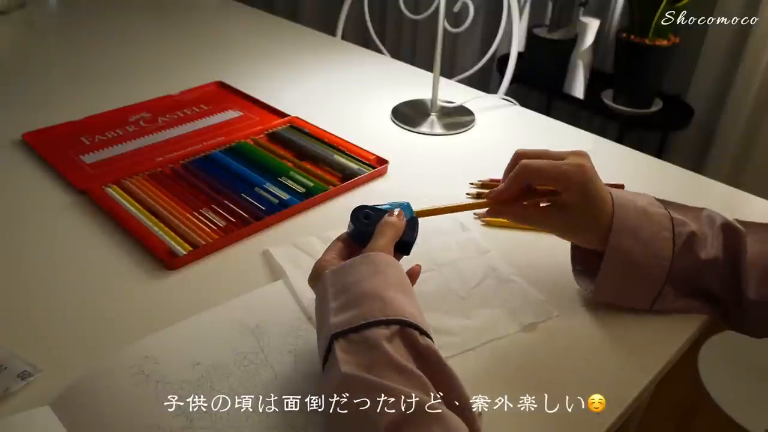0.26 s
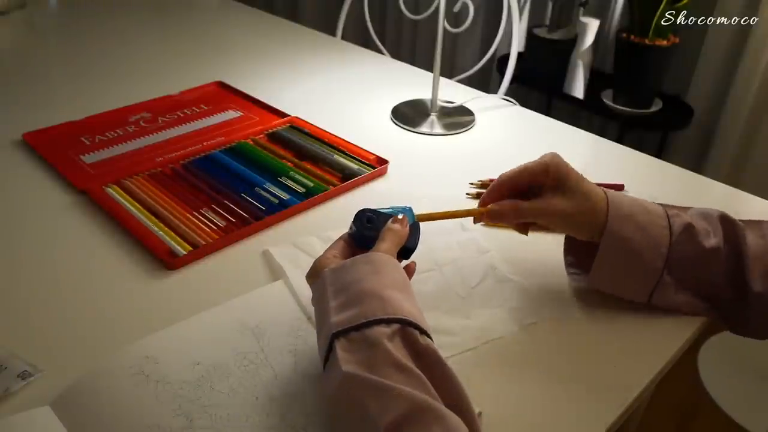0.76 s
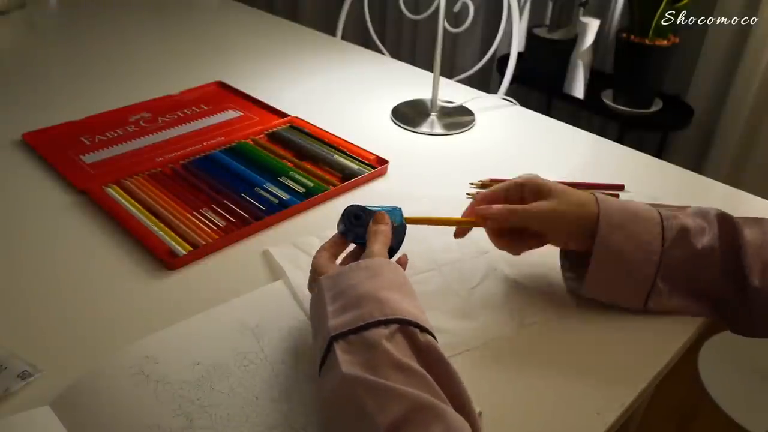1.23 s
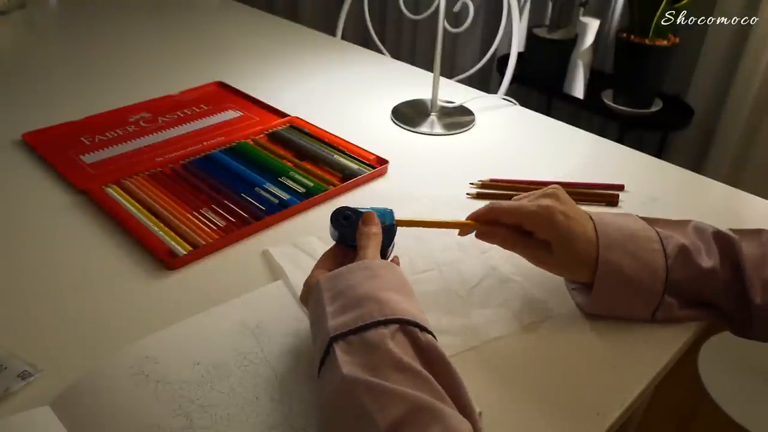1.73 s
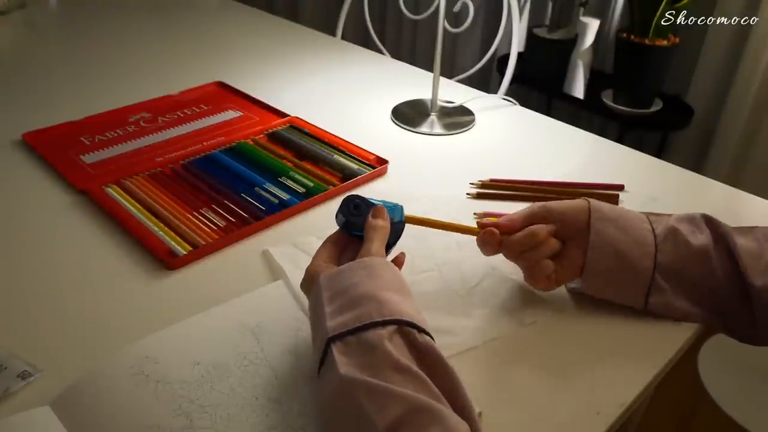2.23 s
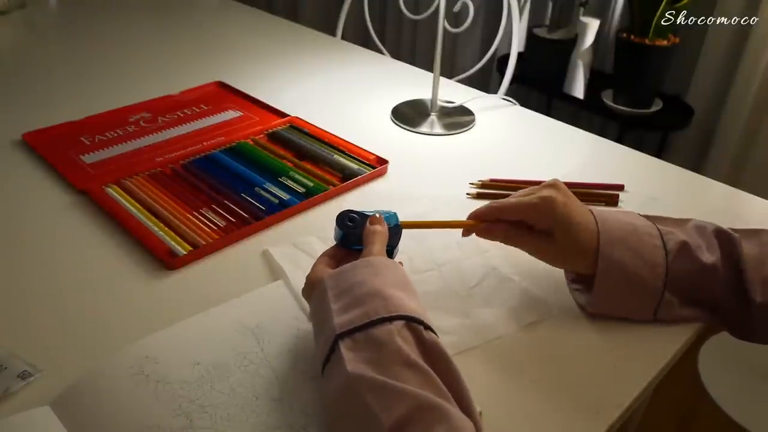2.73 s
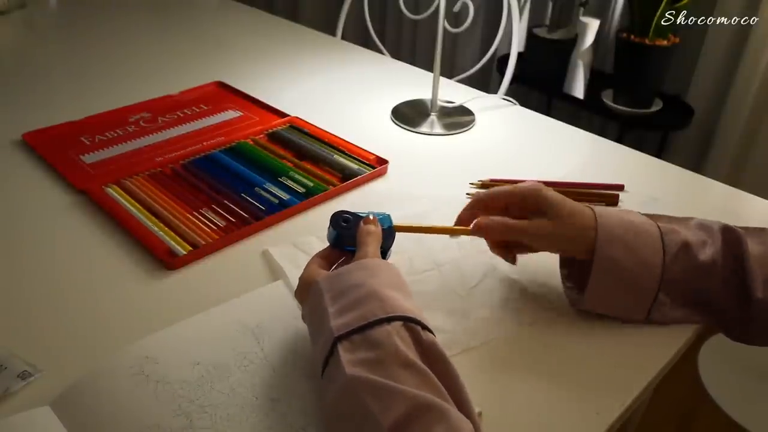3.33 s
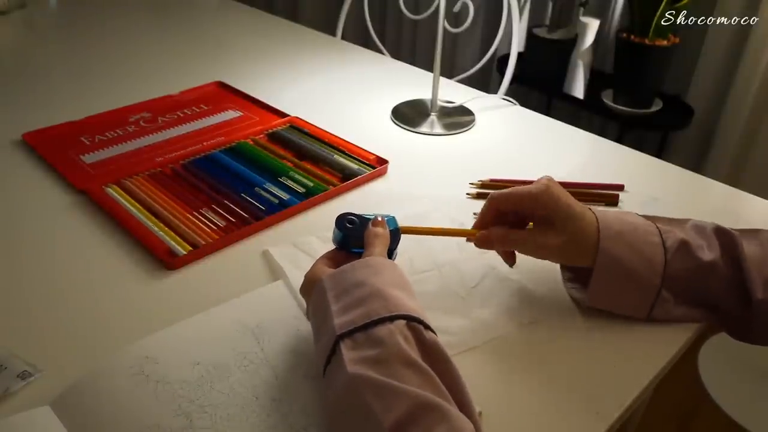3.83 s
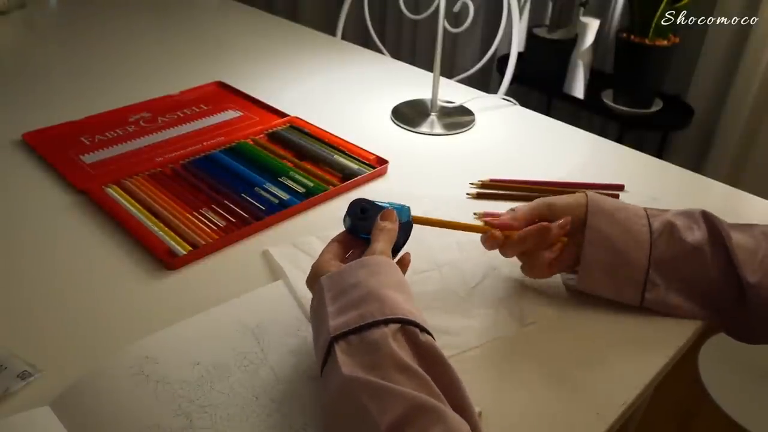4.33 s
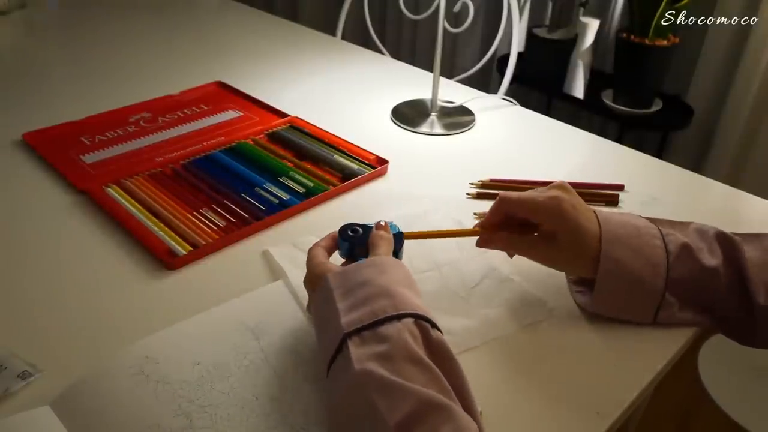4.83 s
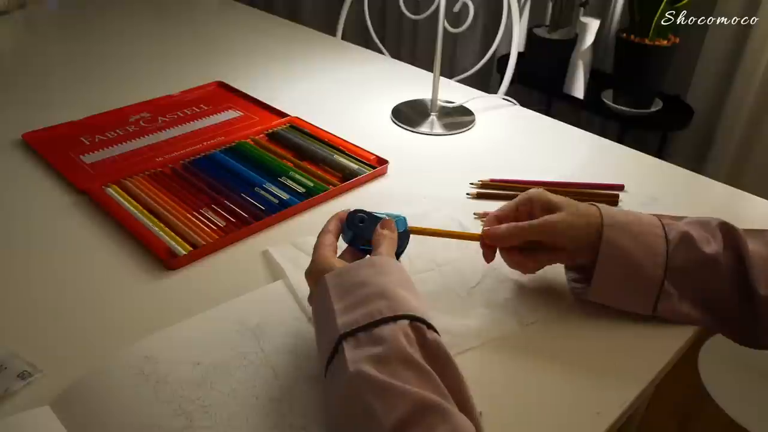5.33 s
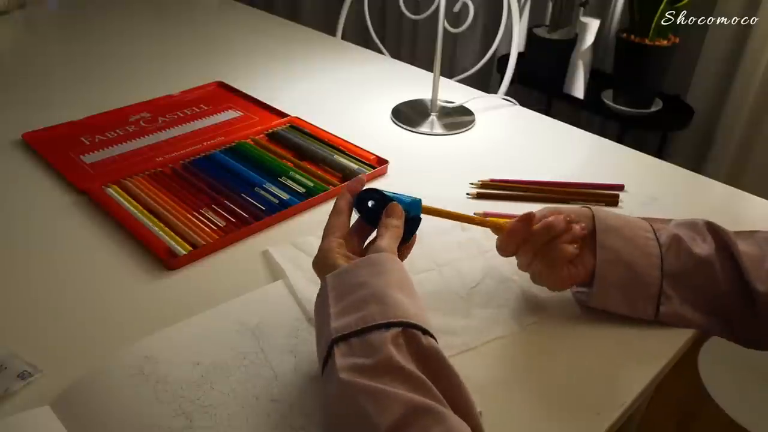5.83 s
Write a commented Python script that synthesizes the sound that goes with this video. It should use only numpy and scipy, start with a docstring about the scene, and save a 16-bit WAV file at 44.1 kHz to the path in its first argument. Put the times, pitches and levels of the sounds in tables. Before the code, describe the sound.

A wooden pencil is twisted five times in a small plastic sharpener, giving crisp, dry, crackly scrapes with quiet pauses in a still room.

```python
"""A pencil sharpener: a wooden pencil is twisted five times in a small plastic case, in a quiet room.
The blade lifts the shaving in a stream of tiny fractures, a noise of grains that rings in pencil, blade
and case; bigger splinters snap as decaying bursts. The fingers rub (slow filtered grains) and bump
(damped low modes), and cloth brushes the desk once (filtered noise). Reflections and a short diffuse
tail give the room; coloured noise gives its still air."""
import sys
import numpy as np
from scipy import signal
from scipy.fft import rfft, irfft, next_fast_len
from scipy.io import wavfile

SR = 44100
rng = np.random.default_rng(int(sys.argv[2]) if len(sys.argv) > 2 else 0)


def bounce(signal):
    """Save signal as a 16-bit WAV file at the path given by the first command-line argument."""
    frames = np.transpose(np.atleast_2d(signal))
    limited = np.clip(frames, -1, 1)
    pcm = np.round(limited * 32767).astype(np.int16)
    wavfile.write(sys.argv[1], SR, pcm)


N = 267687
TIME = np.arange(N) / SR  # s

# resonances of pencil and blade while each twist skims the wood:
# (centre [Hz], width [Hz], level [dB])
SKIM_1 = [(3700, 440, -21), (4740, 390, 7), (5600, 400, 3), (6180, 950, 14.5), (7340, 700, 4),
          (9200, 1500, -2), (13200, 700, 2)]
SKIM_2 = [(1830, 300, 3), (3650, 480, 10), (4530, 500, 6), (5660, 660, 2), (7200, 1100, 6),
          (11700, 1900, 7)]
SKIM_3 = [(2900, 800, -2), (4440, 290, 5.5), (5700, 1400, -13), (6760, 400, 9), (7300, 1200, 4),
          (11300, 670, -3), (13200, 900, 0)]
SKIM_4 = [(1600, 230, -7), (2040, 1300, 9), (3820, 560, -1), (5250, 600, 2), (6070, 400, 0), (7870, 550, 7),
          (13150, 500, 4)]
SKIM_5 = [(1820, 770, 7.5), (2630, 220, 0), (3250, 200, 6.5), (3750, 190, -17), (4570, 1500, 4),
          (5940, 440, 0), (7860, 500, -4), (13300, 600, 3)]
# resonances of pencil and blade once the blade bites deep:
# (centre [Hz], width [Hz], level [dB])
BITE_1 = [(1750, 340, -7), (3200, 140, 10.5), (3650, 540, -14), (4770, 280, 11), (5500, 270, 2),
          (6220, 440, 12), (11600, 900, -3)]
BITE_2 = [(1760, 200, 5.5), (3700, 500, 2), (5100, 600, 3), (6000, 400, 1), (7450, 1500, 6),
          (10300, 600, 5), (12300, 600, 3)]
BITE_3 = [(1760, 240, 4.5), (3230, 350, 6), (4100, 450, 4), (5700, 420, -9), (7000, 770, 5.5),
          (8040, 500, 3.5), (10400, 450, 1)]
BITE_4 = [(1820, 300, 3), (3680, 400, 0), (4670, 960, 7), (5800, 840, 7), (8750, 600, 5.5), (11400, 700, 2),
          (14400, 970, 5)]
BITE_5 = [(2490, 380, -10), (3470, 600, -2.5), (4920, 550, 3), (6100, 280, 7.5), (7750, 400, 6.5),
          (11500, 700, 4.5), (13400, 860, 5)]
# each twist: (skimming resonances, biting resonances)
GRIPS = [(SKIM_1, BITE_1), (SKIM_2, BITE_2), (SKIM_3, BITE_3), (SKIM_4, BITE_4), (SKIM_5, BITE_5)]
# a twist skims, bites deeper, then stops; skim and bite levels are those of the rasp as each stage begins:
# (start [s], bite [s], stop [s], skim level [dB], skim swell [dB/s], bite level [dB], bite swell [dB/s],
#  then relative to the rasp: pencil body [dB], hollow case [dB], fine hiss [dB])
TWISTS = [(0.664, 0.935, 1.083, -57.5, 32, -54, 92, 1.5, -10.5, 1.5),
          (1.898, 2.099, 2.255, -54, -19, -44, -30, -3, -8.5, 2),
          (2.774, 2.985, 3.16, -51, 19, -46, 16, -2.5, -9.5, 0.5),
          (3.77, 4.052, 4.31, -62, 45.5, -46.5, 3, -2.5, -7.5, 1),
          (4.935, 5.49, 5.854, -52, 5, -46, -26.5, 2, -3, 2.5)]
# the biggest splinters snapping under the blade:
# (time [s], relative level [dB], ring [Hz], extra ring of the hollow case [dB])
SNAPS = [(0.765, -28, 6250, -7), (0.8397, -34, 6000, 6), (1.0675, -17.5, 5750, 3),
         (1.0804, -22.5, 5860, 1.5), (1.628, -45, 5070, 1.5), (1.8825, -37.5, 6200, 7),
         (1.91, -26, 11300, 6), (2.0844, -27.5, 7900, 3), (2.129, -30, 7340, 1.5), (2.363, -37.5, 8460, 10),
         (2.7767, -13, 7500, -3.5), (2.8013, -24.5, 7370, 5), (2.8502, -25.5, 7400, 0),
         (2.875, -27, 7700, 5), (2.9057, -27, 7440, 0), (3.018, -26, 8350, 1.5), (3.115, -21, 7900, -2),
         (3.1263, -20.5, 7000, 0), (3.8541, -37, 7800, 1.5), (4.0786, -30, 5100, 1.5),
         (4.105, -18, 5300, -5), (4.2457, -23.5, 6000, 9), (4.2756, -22, 9150, 1.5),
         (4.9467, -48, 8200, 1.5), (4.993, -31, 7950, 12), (5.0127, -29, 7760, 7), (5.0463, -28, 10400, -3),
         (5.1226, -19.5, 3200, 6), (5.2664, -32, 4500, 1.5), (5.4491, -27, 5840, 1.5),
         (5.4776, -27.5, 6000, 1.5), (5.5212, -19.5, 7730, -8), (5.7788, -23.5, 5330, 8)]


def sharpening(snap_db=0.5):
    """Superposition: five twists and the snaps, each twist with its own diffuse tail as the hands shift."""
    out = 0
    for row, (skim, bite) in zip(TWISTS, GRIPS):
        scrape = np.zeros(N)
        add(scrape, row[0], twist(row, skim, bite))
        out = out + room(scrape, tail_db=-7.0, side_db=-12.0)
    snaps = np.zeros(N)
    for time_s, level_db, ring_hz, case_db in SNAPS:
        add(snaps, time_s, from_db(level_db + snap_db) * snap(ring_hz, case_db))
    return out + room(snaps, tail_db=-2.0, side_db=-11.5)


# broad colour of breaking wood: (frequency [Hz], level [dB])
WOOD = [(500, -9), (1400, -18), (2000, -11.5), (2600, -15), (3300, -8.5), (4500, -1), (7200, 4), (9600, -1),
        (12000, 4.5), (13400, 4.5), (13900, 5.5), (15500, -3.5)]
# the sharpener's own resonances: (centre [Hz], width [Hz], level [dB])
SHARPENER = [(1717, 266, 5.5), (4020, 280, 5.5), (4900, 400, 3.5), (6340, 400, 6.5), (7950, 830, 3),
             (10850, 220, 4.5), (13500, 400, -5.5)]
ATTACK_S, RELEASE_DB_PER_S = 0.02, 222
CHIP_DB = -11.5  # relative to the fractures before their judder


def twist(row, skim, bite, judder_db=2.5, wander_db=1.0, turn_s=0.017):
    """Stick-slip cutting: the blade catches on the grain; its fractures ring in case, pencil and blade."""
    start_s, bite_s, stop_s, skim_db, skim_swell, bite_db, bite_swell, body_db, case_db, fine_db = row
    t = start_s + TIME[:SR * 5 // 4]
    cutting = t < stop_s
    turning = np.minimum(t, stop_s)

    # level and resonances shift as the blade digs in
    depth = .5 + .5 * np.tanh((t - bite_s) / turn_s)
    skim_effort_db = skim_db + skim_swell * (turning - start_s)
    bite_effort_db = bite_db + bite_swell * (turning - bite_s)
    effort_db = (1 - depth) * skim_effort_db + depth * bite_effort_db
    # once the turning stops, the sound dies away smoothly
    effort_db = effort_db - RELEASE_DB_PER_S * (t - turning) + holding_back(t)

    judder = from_db(judder_db * cutting * flutter(len(t), per_s=440))
    fractures = grains(len(t), per_s=6000, spread_db=4.0, smooth_db=-1) * judder
    cut = fractures + from_db(CHIP_DB) * chips(len(t)) * cutting
    skimmed = coloured(cut * (1 - depth), WOOD, SHARPENER + skim)
    bitten = coloured(cut * depth, WOOD, SHARPENER + bite)
    wood = skimmed + bitten

    case = from_db(effort_db + case_db) * band(wood, 786, 3040, cutting)
    body = from_db(effort_db + body_db) * band(wood, 2990, 6410, cutting)
    rasp = from_db(effort_db) * band(wood, 6600, 10000, cutting)
    hiss = from_db(effort_db + fine_db) * band(wood, 9660, 16200, cutting)
    # each fibre excites the parts in a different proportion
    parts = 0
    for part in (case, body, rasp, hiss):
        parts = parts + part * from_db(wander_db * flutter(len(t), per_s=150))
    return np.minimum((t - start_s) / ATTACK_S, 1) * parts


def grains(count, per_s, spread_db, smooth_db):
    """Impulsive excitation: tiny fractures of uneven size at random moments, over smooth friction."""
    sizes_db = spread_db * np.minimum(rng.exponential(1, count), 4)
    sizes = from_db(sizes_db) * rng.choice([-1, 1], count)
    cracks = rms_one(sizes * (rng.random(count) < per_s / SR))
    return rms_one(cracks + from_db(smooth_db) * rng.standard_normal(count))


CHIPS_PER_S = 65


def chips(count, crack_t60_s=0.021):
    """Random arrivals: small chips flake off, each starting an equal exponential decay filled with noise."""
    born = rng.random(count) < CHIPS_PER_S / SR
    decay = from_db(-60 / (crack_t60_s * SR))  # gain per sample
    envelope = signal.lfilter([1], [1, -decay], born + 1e-18)
    return rms_one(envelope * rng.standard_normal(count))


# the hand hesitates: (time [s], half length [s], dip [dB])
HESITATIONS = [(0.94, 0.047, -2.5), (4.972, 0.017, -12.5), (5.097, 0.024, -10), (5.199, 0.033, -5.5),
               (5.436, 0.075, -6.5)]
STICK_S, STICK_DB = 0.018, -3.0  # the blade sticks for a moment before each snap


def holding_back(t):
    """Modulation of the cutting in dB: dips where the hand hesitates and just before a splinter gives way."""
    hand = sum(db * np.exp(-((t - s) / half_s) ** 2) for s, half_s, db in HESITATIONS)
    stuck = np.max([(t < s) * np.exp(-((t - s) / STICK_S) ** 2) for s, *_ in SNAPS], axis=0)
    return hand + STICK_DB * stuck


# colour of a snap: (frequency [Hz], level [dB])
CRACK = [(500, -25), (1700, -14), (2600, -20.5), (3200, -4.5), (3900, -6.5), (4700, -1), (5500, -5),
         (7500, 0.5), (9000, -4), (11500, 0), (15500, -2)]
CASE_RING_HZ, CASE_RING_WIDTH_HZ = 2300, 1800


def snap(ring_hz, case_db, ring_width_hz=800, ring_db=10,
         crack_t60_s=0.0079, crumble_db=-22, crumble_t60_s=0.076, crest_db=9.5):
    """Sudden release: a splinter cracks sharply, then the fibres around it crumble more slowly."""
    t = TIME[:SR // 12]
    crack = rng.choice([-1, 1], len(t)) * from_db(-60 * t / crack_t60_s)
    crumbs = rng.standard_normal(len(t)) * from_db(crumble_db - 60 * t / crumble_t60_s)
    rings = [(ring_hz, ring_width_hz, ring_db), (CASE_RING_HZ, CASE_RING_WIDTH_HZ, case_db)]
    sound = coloured(crack + crumbs, CRACK, SHARPENER + rings)
    attack = sound[:SR // 500]  # the first 2 ms set the level
    return from_db(-crest_db) * sound / attack.std()


# dull bumps of the hands:
# (time [s], relative level [dB], main ring [Hz], hardness [dB per octave])
BUMPS = [(0.275, -35.5, 524, -7), (0.631, -43, 500, -8), (1.393, -31, 615, -3.5), (3.06, -37, 511, -12),
         (4.894, -38.5, 480, -6)]
# what a bump rings with besides its main ring: (frequency [Hz], level [dB], t60 [s])
BUMP_MODES = [(377, -22.5, 0.23), (558, 7, 0.019), (635, -22, 0.23), (1237, -0.5, 0.025)]


def bumps(bump_db=-1, main_t60_s=0.03, contact_s=0.0033):
    """Modal synthesis: soft knocks ring damped low modes; a harder contact brings out the upper ones."""
    out, t = np.zeros(N), TIME[:SR // 5]
    for time_s, level_db, main_hz, hard_db in BUMPS:
        knock = from_db(-60 * t / main_t60_s) * np.sin(2 * np.pi * main_hz * t)
        for hz, mode_db, t60_s in BUMP_MODES:
            tilt_db = hard_db * np.log2(hz / main_hz)
            knock += from_db(mode_db + tilt_db - 60 * t / t60_s) * np.sin(2 * np.pi * hz * t)
        knock *= 1 - np.exp(-t / contact_s)  # the soft contact builds up
        add(out, time_s, from_db(level_db + bump_db) * knock / np.abs(knock).max())
    return out


# fingers rubbing on the case: (time [s], relative level [dB])
RUB = [(0.0, -61.5), (0.59, -57.5), (0.96, -58.5), (1.39, -61.5), (1.55, -57), (2.57, -59), (2.82, -62),
       (3.52, -55), (4.26, -58.5), (4.77, -62.5), (5.21, -55.5), (6.07, -59.5)]
# colour of the rubbing: (frequency [Hz], level [dB])
RUB_COLOUR = [(120, -13.5), (170, -13), (220, 0), (330, -5), (450, -3.5), (660, -4.5), (780, -11.5),
              (1150, -8), (1500, -16), (2200, -22.5), (6000, -42)]
# low resonances under the rubbing: (centre [Hz], width [Hz], level [dB])
RUB_RINGS = [(412.5, 22, 9.5), (508, 56, 7.5)]
# colour of the sleeve on the desk: (frequency [Hz], level [dB])
BRUSH_COLOUR = [(800, -22), (1800, -4), (2600, 0.5), (3700, -10), (5300, -2), (8000, -18), (15000, -22)]
BRUSH_S, BRUSH_DB, BRUSH_RISE_DB_PER_S, BRUSH_FALL_DB_PER_S = 0.21, -54, 500, 300


def handling(rub_db=-1.0, uneven_db=1.63):
    """Dry friction: skin creeps over the case in small slips; a sleeve brushes the desk once."""
    slips = coloured(grains(N, per_s=500, spread_db=2.5, smooth_db=-1), RUB_COLOUR, RUB_RINGS)
    rub_level_db = np.interp(TIME, *np.transpose(RUB)) + rub_db + uneven_db * flutter(N, per_s=21)
    rub = from_db(rub_level_db) * rms_one(slips)
    cloth = coloured(rng.standard_normal(N), BRUSH_COLOUR)
    rise_db, fall_db = BRUSH_RISE_DB_PER_S * (BRUSH_S - TIME), BRUSH_FALL_DB_PER_S * (TIME - BRUSH_S)
    brush = from_db(BRUSH_DB - np.maximum(rise_db, fall_db)) * rms_one(cloth)
    return rub + brush


# reflections from desk and walls: (delay [s], level [dB])
ECHOES = [(.011, -17.5), (0.0248, -42)]
ROOM_T60_S = 0.16


def room(x, tail_db, side_db, build_s=0.0026):
    """Convolution with a room response: clear reflections, then a short diffuse tail that gives the width."""
    t = TIME[:SR // 3]
    envelope = from_db(-60 * t / ROOM_T60_S) * (1 - np.exp(-t / build_s))
    tails = rms_one(rng.standard_normal((2, len(t))) * envelope)
    mid, side = from_db([[tail_db], [side_db]]) * tails / np.sqrt(len(t))
    mid[0] += 1  # direct sound
    for delay_s, db in ECHOES:
        mid[round(delay_s * SR)] += from_db(db)
    response = np.array([mid + side, mid - side])
    return signal.fftconvolve(x[None], response, axes=1)[:, :N]


# colour of still room and microphone hiss: (frequency [Hz], level [dB])
AIR = [(20, -3.5), (30, -9), (43, -3), (54, -3.5), (72, -3.5), (105, -7.5), (400, -9), (1100, -16.5),
       (2300, -30), (3600, -22.5), (5300, -26), (6400, -21.5), (9800, -27), (15000, -22.5)]
# the room's faint hum: (centre [Hz], width [Hz], level [dB])
AIR_HUM = [(40.4, 10.6, 8), (418, 11.5, 9.5), (503.7, 4.7, 9.5), (702, 13, 4.5)]
# width of the still air: (frequency [Hz], side relative to mid [dB])
AIR_SIDE = [(25, -44), (70, -16), (400, -24.5), (1200, -9), (4000, -7), (15000, -10)]
AIR_DB = -55.5


def air():
    """Stationary coloured noise: low rumble and hum, nearly alike in both ears, and a wider faint hiss."""
    mid, side = [rms_one(coloured(noise, AIR, AIR_HUM)) for noise in rng.standard_normal((2, N))]
    return from_db(AIR_DB) * (mid + coloured(side, AIR_SIDE) * [[1], [-1]])


def from_db(db):
    """Logarithmic level: decibels to amplitude gain."""
    return 10 ** (np.asarray(db) / 20)


def rms_one(x):
    """Power normalisation: scale to unit mean square."""
    return x / np.sqrt(np.mean(x ** 2) + 1e-20)


def add(track, start_s, sound):
    """Linear superposition: mix a sound into a track."""
    at = round(start_s * SR)
    track[at:at + len(sound)] += sound[:N - at]


def coloured(x, spectrum, resonances=()):
    """Minimum-phase filtering: a causal filter made of a broad spectrum and resonance peaks."""
    size = 2 * next_fast_len(len(x) // 2 + 1024)
    hz = np.maximum(np.arange(size // 2 + 1) * SR / size, 1)
    points_hz, points_db = np.transpose(spectrum)
    db = np.interp(np.log(hz), np.log(points_hz), points_db)
    for centre, width, peak_db in resonances:
        db = db + peak_db / (1 + (2 * (hz - centre) / width) ** 2)
    # folding the cepstrum onto positive time makes the phase minimal
    cepstrum = irfft(np.log(from_db(db)))[:size // 2]
    cepstrum[1:] *= 2
    return irfft(rfft(x, size) * np.exp(rfft(cepstrum, size)))[:len(x)]


def band(x, low_hz, high_hz, during):
    """Band-pass filtering: one register of a sound, at unit power over the given stretch."""
    y = signal.sosfilt(signal.butter(5, [low_hz, high_hz], "band", fs=SR, output="sos"), x)
    return y / y[during].std()


def flutter(count, per_s):
    """Low-rate random modulation: interpolated random unevenness of spread 1."""
    knots = np.arange(count) * per_s / SR
    return rms_one(np.interp(knots, np.arange(count), rng.standard_normal(count)))


def scene():
    """Superposition in one small room: sharpener and hands in the middle, over the still air."""
    hands = room(bumps() + handling(), tail_db=-13, side_db=-16)
    return sharpening() + hands + air()


CUTOFF_HZ = 15700


def record(dry):
    """Band limiting: a steep low-pass cuts the top."""
    return signal.sosfilt(signal.ellip(12, .1, 80, CUTOFF_HZ, fs=SR, output="sos"), dry)


dry = scene()
out = record(dry)
bounce(out)
```